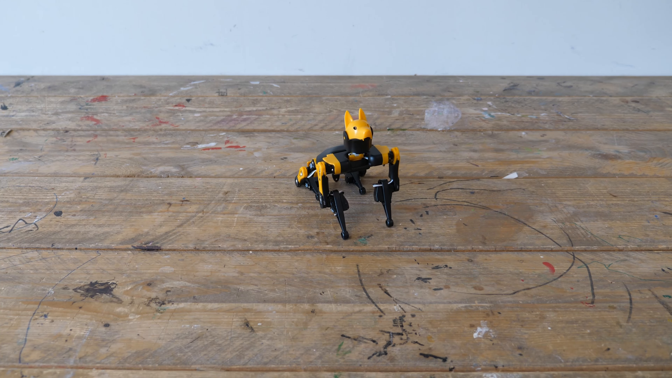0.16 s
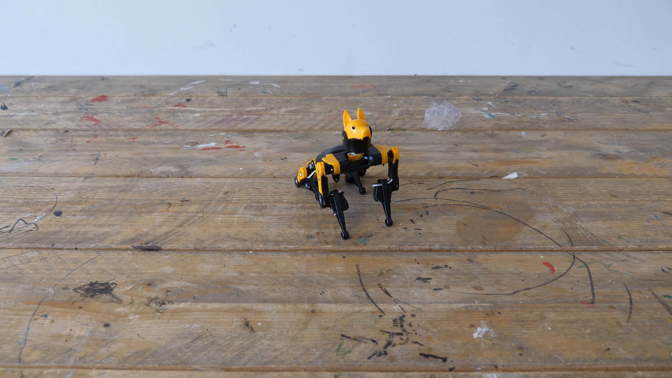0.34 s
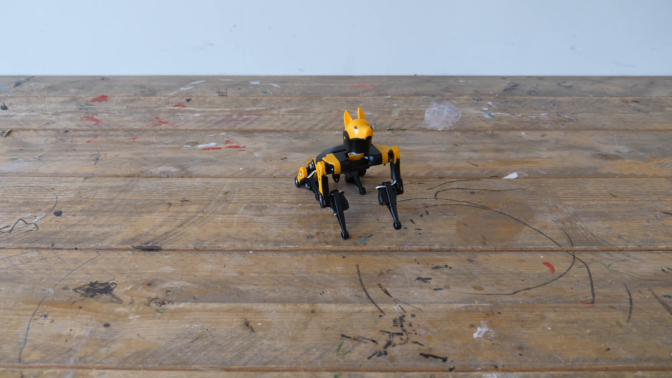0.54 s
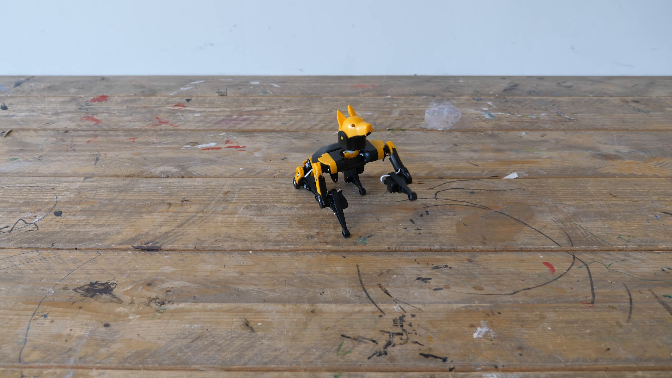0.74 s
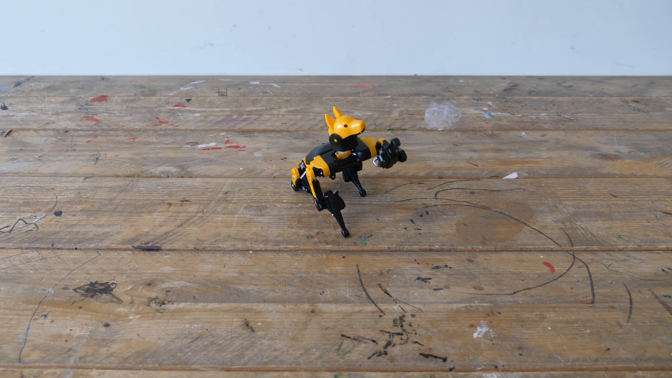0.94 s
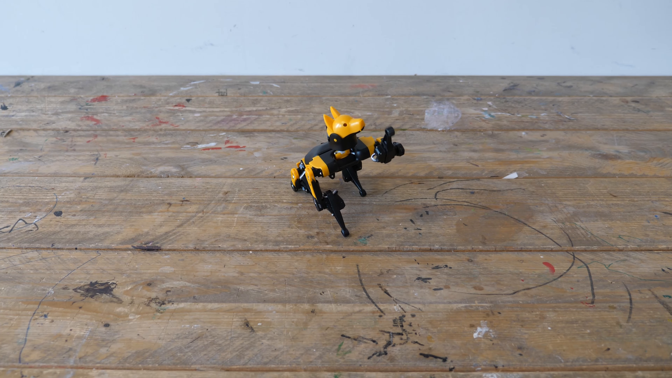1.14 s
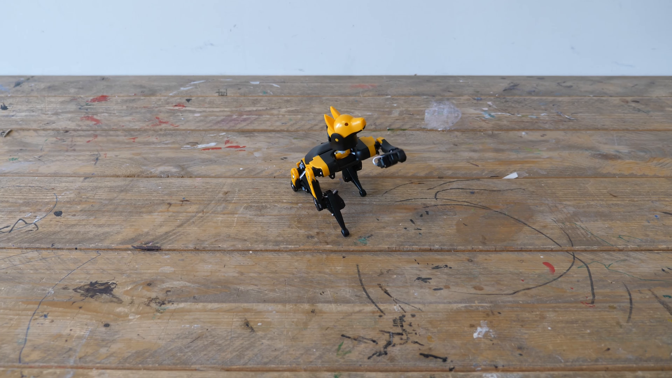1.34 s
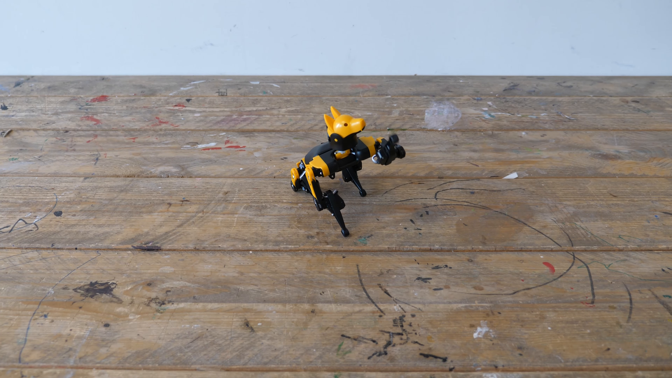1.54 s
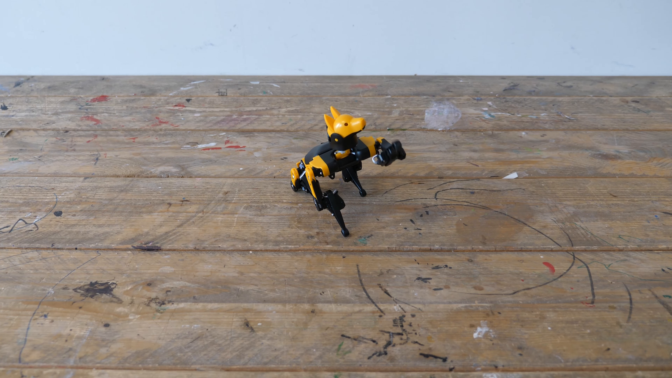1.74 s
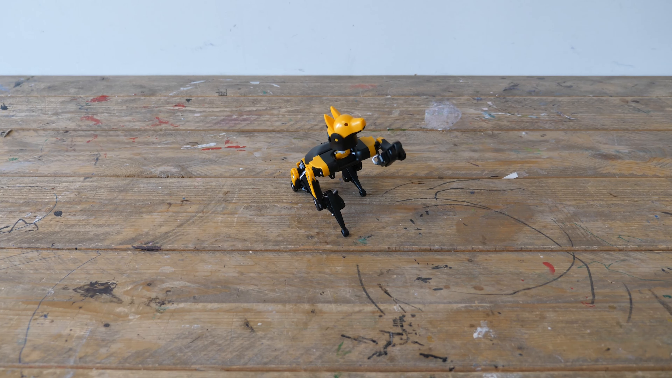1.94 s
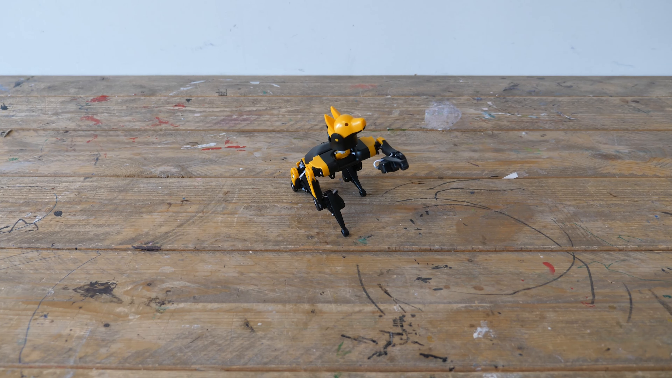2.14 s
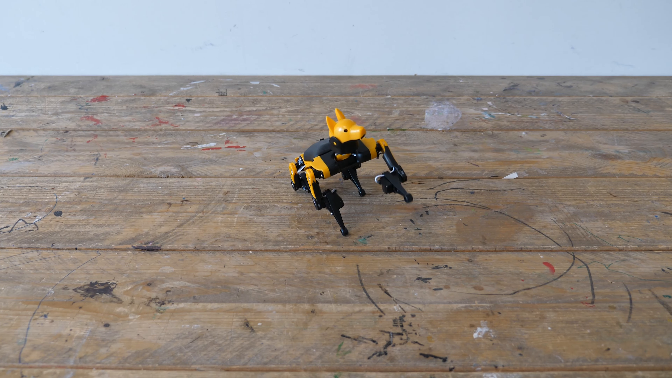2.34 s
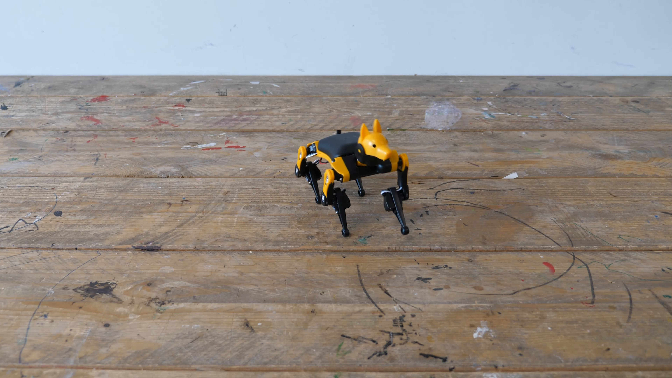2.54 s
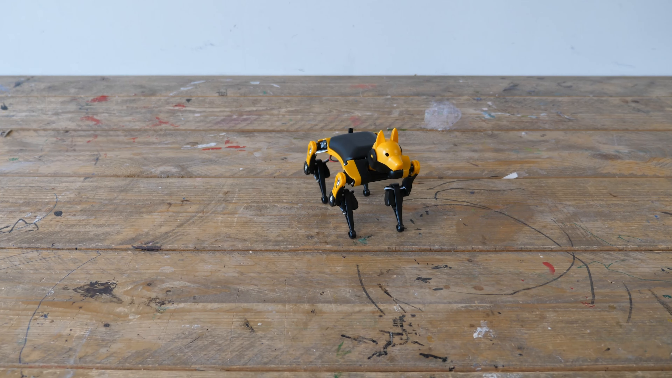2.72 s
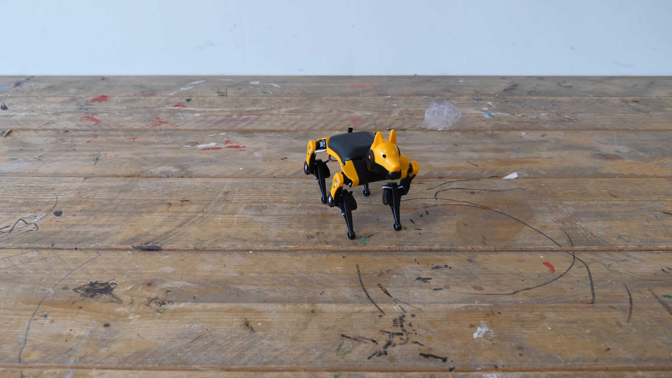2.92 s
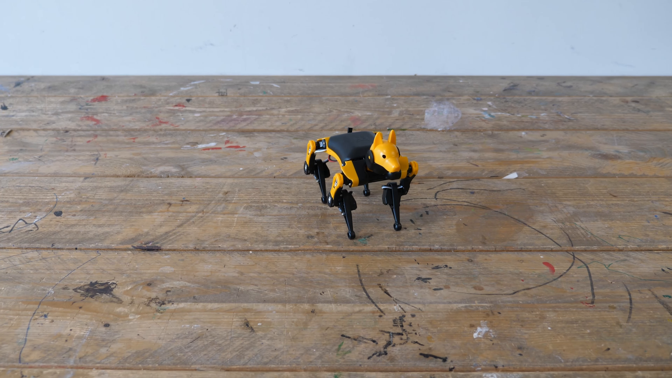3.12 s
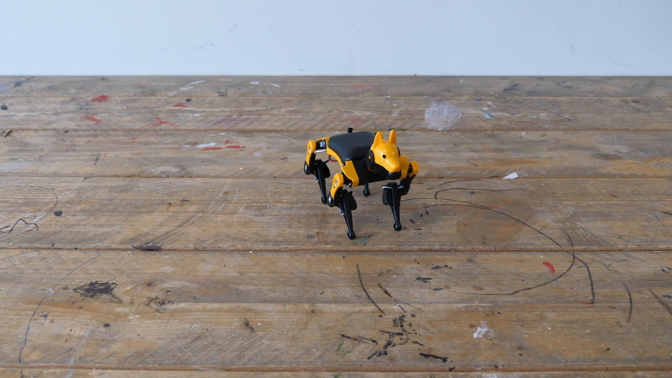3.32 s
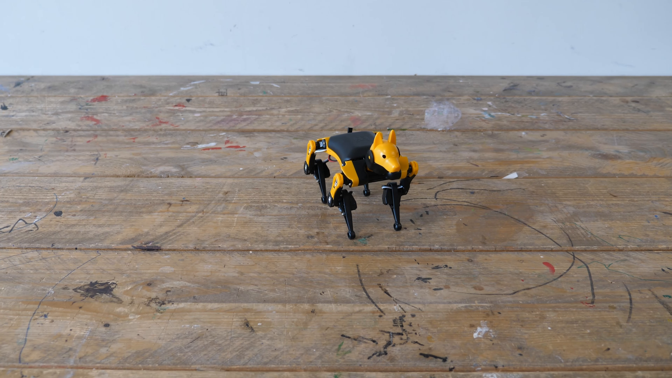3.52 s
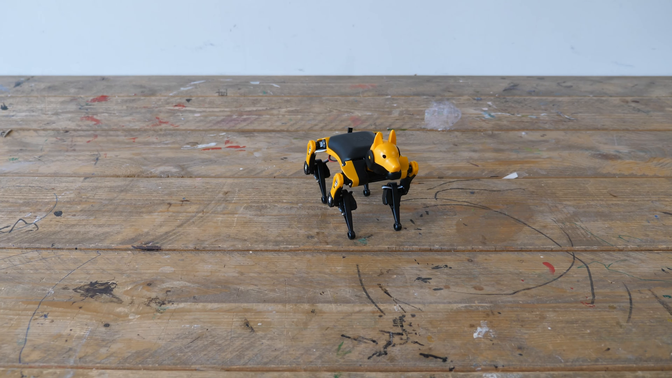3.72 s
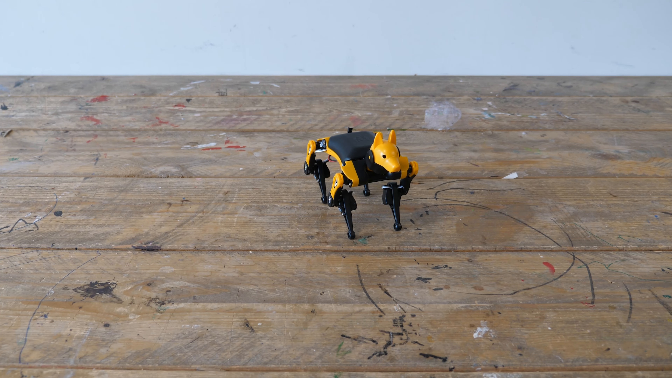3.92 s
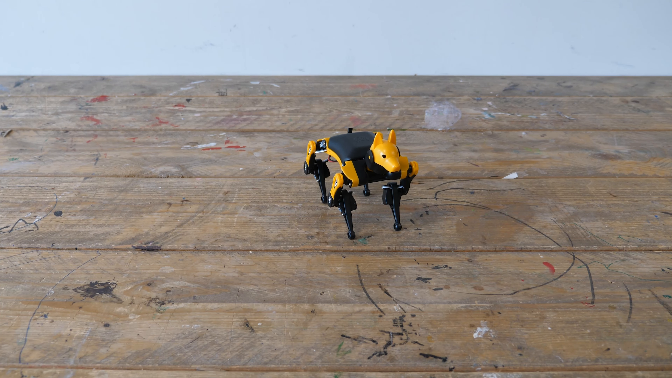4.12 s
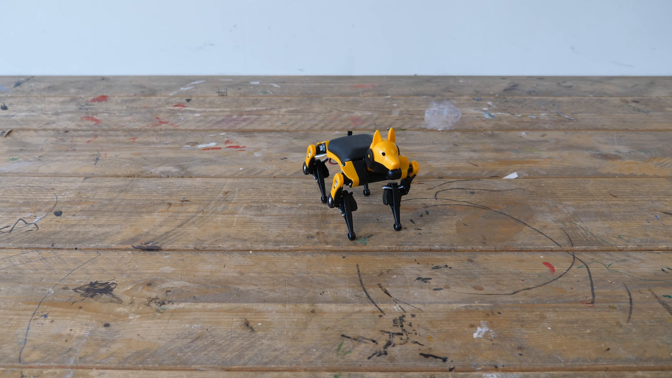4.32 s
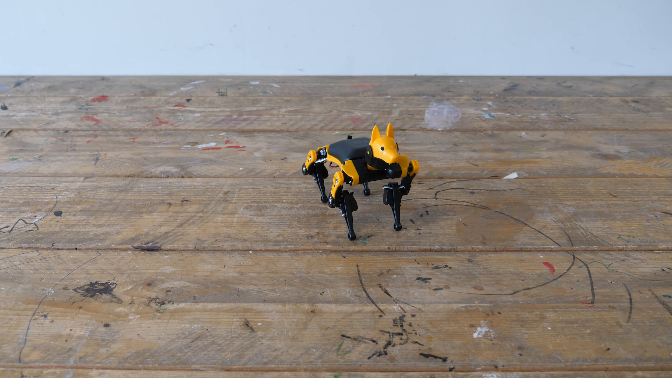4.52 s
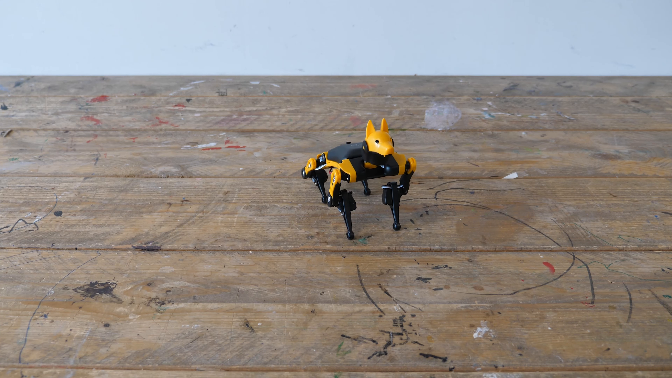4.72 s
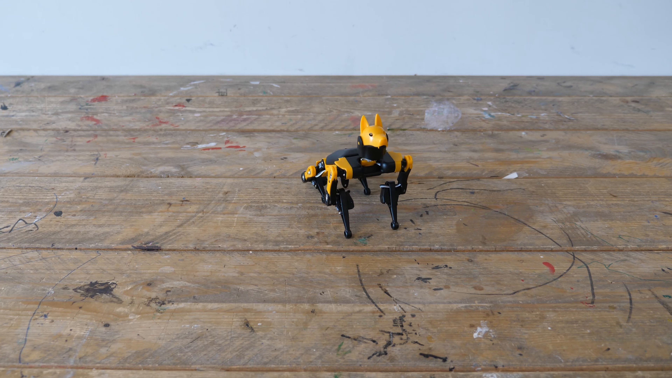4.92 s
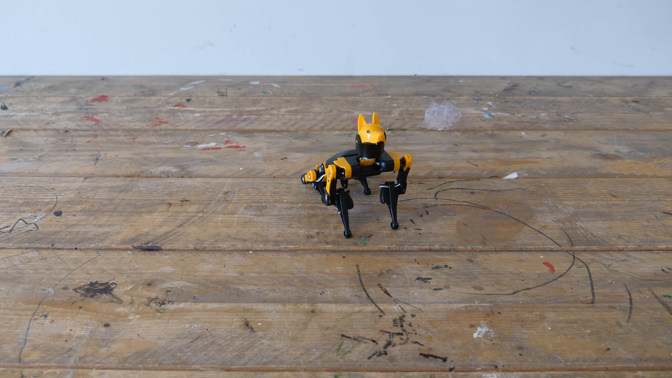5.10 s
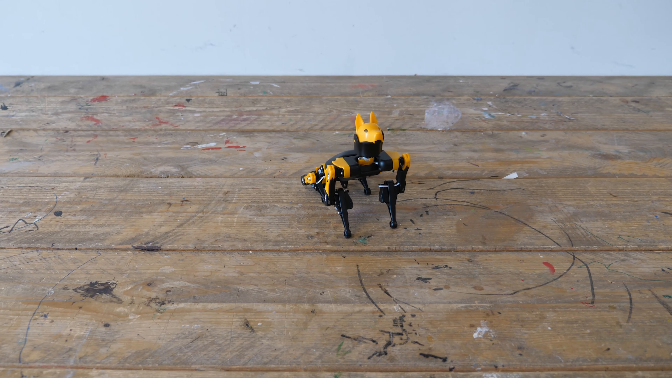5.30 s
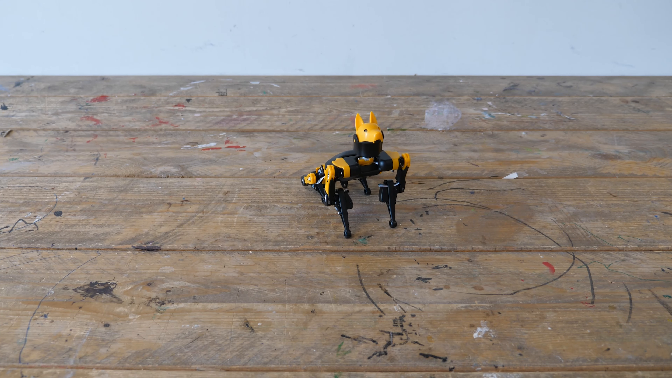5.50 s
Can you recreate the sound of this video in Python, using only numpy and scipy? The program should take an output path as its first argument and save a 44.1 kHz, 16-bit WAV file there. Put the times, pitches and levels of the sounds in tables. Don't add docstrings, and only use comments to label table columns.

```python
import sys
import numpy as np
from scipy import signal
from scipy.fft import rfft, irfft, next_fast_len
from scipy.io import wavfile
from scipy.ndimage import uniform_filter1d

SR = 44100
rng = np.random.default_rng(int(sys.argv[2]) if len(sys.argv) > 2 else 0)


def to_wav(sig):
    pcm = np.clip(np.atleast_2d(sig), -1, 1) * 32767
    pcm = np.round(pcm).astype(np.int16)
    wavfile.write(sys.argv[1], SR, pcm.T)


def volts(x):
    e = np.asarray(x, float) / 20
    return 10 ** e


N = 249247
STEP = 32
REFERENCE_DB = -50


def rms_one(x):
    return x / np.sqrt(np.mean(x ** 2) + 1e-20)


def drift(rate):
    r = np.exp(-40 * np.pi * rate / SR)
    noise = rng.standard_normal(N // 20 + 2002)
    slow = signal.lfilter([1], [1, -2 * r, r * r], noise)[2000:]
    return np.interp(np.arange(N) / 20, np.arange(len(slow)), rms_one(slow - slow.mean()))


def resonance(x, hz, width):
    r = np.exp(-np.pi * width / SR)
    return signal.lfilter([(1 - r * r) / 2, 0, (r * r - 1) / 2], [1, -2 * r * np.cos(2 * np.pi * hz / SR), r * r], x)


def body(x, modes):
    return sum((-1) ** k * volts(db) * resonance(x, hz, width) for k, (hz, width, db) in enumerate(modes))


def band(x, low_hz, high_hz):
    return signal.sosfilt(signal.butter(3, [low_hz, high_hz], "band", fs=SR, output="sos"), x)


def grains(per_s, spread_db):
    sizes = volts(spread_db * np.minimum(rng.exponential(1, N), 5)) * rng.choice([-1, 1], N)
    return sizes * (rng.random(N) < per_s / SR)


def evened(x):
    return x / np.sqrt(uniform_filter1d(x * x, size=4410) + 1e-20)


def hush():
    return 1e-9 * rng.standard_normal(N)


def full(slow):
    return np.interp(np.arange(N) / STEP, np.arange(len(slow)), slow)


BODY_MOVES = { "settle": [(0.0, -57), (0.142, -60.5), (0.206, -67.5), (0.246, -66), (0.378, -83.5),
              (0.46, -99.5)], "lift": [(0.462, -66), (0.518, -54.5), (0.6, -48.5), (0.764, -43),
              (0.946, -42.5), (1.075, -53), (1.09, -55), (1.135, -64), (1.16, -84)],
              "stand": [(2.16, -63.5), (2.192, -62), (2.308, -49.5), (2.516, -45.5), (2.652, -48),
              (2.69, -48)], "brace": [(2.69, -66), (2.719, -48), (2.793, -54.5), (2.84, -59), (2.87, -77),
              (2.93, -63), (2.96, -84.5), (3.06, -75)], "sit": [(4.16, -67), (4.22, -64), (4.304, -57),
              (4.492, -53), (4.78, -51), (4.9, -52), (5.198, -60), (5.3, -72.5), (5.6, -79)], }
LEG_STROKES = { "up": [(1.216, -47.5, 0.0037, 0.08), (1.581, -48, 0.023, 0.094),
               (1.954, -47.5, 0.028, 0.09)], "down": [(1.392, -45.5, 0.038, .12),
               (1.766, -45.5, .034, 0.13)], "twitch": [(1.19, -66.5, 0.018, .025), (5.2, -62.5, .01, 0.012),
               (5.375, -64, 0.025, 0.053)], }
STROKE_CURVE = {"up": (-7, -8, 261, 5.5), "down": (-14, -10.5, 550, -0.5),
                "twitch": (-3.5, -1, 599.5, -1.5)}


def efforts():
    t, out = np.arange(0, N, STEP) / SR, []
    shapes = [(name, rows, 0) for name, rows in BODY_MOVES.items()]
    for name, rows in LEG_STROKES.items():
        start_db, sag_db, brake, bright_db = STROKE_CURVE[name]
        for s, db, rise, run in rows:
            curve = [(s, db + start_db), (s + rise, db), (s + max(run, rise + .001), db + sag_db),
                     (s + run + 40 / brake, db + sag_db - 40)]
            shapes.append((name, curve, bright_db))
    for name, rows, bright_db in shapes:
        s, db = np.transpose(rows)
        along = np.clip((t - s[0]) / (s[-1] - s[0]), 0, 1)
        gate = np.interp(t, [s[0] - .004, s[0], s[-1], s[-1] + .02], [0, 1, 1, 0])
        effort_db = np.interp(t, s, db) - REFERENCE_DB
        out.append((name, effort_db, along, bright_db * np.sin(np.pi * along ** 0.45), gate))
    return out


GEAR_COLOUR = {"settle": (1.5, -4.5, -8.5, -2.5), "lift": (-1, -10, -12.5, -7),
               "stand": (3.5, 0.5, -6.5, -2), "brace": (2.5, -2.5, -6.5, -1), "sit": (2, -2, -9, 1.5),
               "up": (3, -4, -20.5, -7.5), "down": (0, -3, -10, -7), "twitch": (1, -2, -5.5, 3)}
LOWER_CASE_HZ = {"settle": (5360, 5100), "lift": (6040, 5220), "stand": (5200, 5620), "brace": (4630, 4300),
                 "sit": (5020, 4980), "up": (5470, 5570), "down": (5560, 5350), "twitch": (5350, 5250)}
GEAR_SWING = (1.11, 1.25, 1.22, 0.74)


def gear_controls():
    power, case_hz, blur_db, weight = 0, 0, 0, 0
    for name, effort_db, along, bright_db, gate in efforts():
        upper_db, top_db, shell_db, broad_db = GEAR_COLOUR[name]
        zones_db = [0, upper_db, top_db + bright_db, shell_db + 2.4 * bright_db]
        gains = [gate * volts(REFERENCE_DB + z + k * effort_db) for z, k in zip(zones_db, GEAR_SWING)]
        power = power + np.array(gains) ** 2
        share = gate * volts(2 * effort_db) + 1e-12
        first_hz, last_hz = LOWER_CASE_HZ[name]
        case_hz = case_hz + share * (first_hz + (last_hz - first_hz) * along)
        blur_db = blur_db + share * broad_db
        weight = weight + share
    return [full(v) for v in (*np.sqrt(power), case_hz / weight, volts(blur_db / weight))]


def gliding(x, hz, width):
    y, state, r = np.zeros(N), np.zeros(2), np.exp(-np.pi * width / SR)
    for i in range(0, N, 128):
        poles = [1, -2 * r * np.cos(2 * np.pi * hz[i] / SR), r * r]
        y[i:i + 128], state = signal.lfilter([1, 0, -1], poles, x[i:i + 128], zi=state)
    return y


def streaks(teeth):
    pitches = np.geomspace(2100, 15300, 36) * volts(0.21 * rng.standard_normal(36))
    parts = sum(volts(4.6 * drift(5.2)) * resonance(teeth, hz, 0.012 * hz) for hz in pitches)
    return rms_one(teeth) + volts(-3) * rms_one(parts)


# pitch_hz, width_hz, level_db
UPPER_RING = [(7165, 420, -7.5), (7940, 220, 0.5), (8380, 330, -1), (9030, 570, -9.5)]
# pitch_hz, width_hz, level_db
TOP_HISS = [(10360, 1800, -10.5), (12150, 1250, -8.5), (15840, 1100, -6)]
# pitch_hz, width_hz, level_db
SHELL_MODES = [(2480, 1360, 2), (2954, 280, 9), (3670, 640, -4.5), (4350, 110, 0)]
# pitch_hz, width_hz, share taken out
CASE_NOTCH = (11500, 1000, 0.28)


def gears():
    beat_hz, beat_db, teeth_per_s = 59.3, 1.5, 5000
    quiet_db, lumps_per_db = -64, 0.05
    speed_per_db = -0.34
    lower, upper, top, shell, case_hz, blur = gear_controls()
    rattle_db = np.maximum(20 * np.log10(lower + 1e-9), quiet_db - 20)
    turn_hz = beat_hz * (1 + 0.048 * drift(4.9) + speed_per_db * (rattle_db - REFERENCE_DB))
    turn = 2 * np.pi * np.cumsum(turn_hz) / SR
    depth = 1 + lumps_per_db * np.maximum(quiet_db - rattle_db, 0)
    swing_db = beat_db * blur ** -0.5
    beat = volts(depth * (swing_db * np.cos(turn) + 1.1 * drift(53) + 0.35 * drift(49)))
    one, other = [beat * grains(teeth_per_s, spread_db=2.5) for k in range(2)]
    other = streaks(other)

    def zone(rings, low_hz, high_hz):
        ringing = rms_one(band(rings, 0.99 * low_hz, 1.094 * high_hz))
        return evened(ringing + blur * rms_one(band(other, low_hz, high_hz)))

    out = lower * zone(gliding(one, case_hz, width=490), 4144, 5430)
    out += upper * zone(body(one, UPPER_RING), 5080, 10360)
    out += top * zone(body(one, TOP_HISS), 9480, 13600)
    out += shell * zone(body(one, SHELL_MODES), 1550, 3480)
    return out - CASE_NOTCH[2] * resonance(out, *CASE_NOTCH[:2])


# start_s, length_s, pitch_hz, level_db
SINGING_TONES = [(.66, 0.043, 1073, -46), (.72, 0.06, 1370, -50.5), (0.774, 0.095, 1700, -57),
                 (0.873, 0.087, 1390, -54.5), (1.228, 0.075, 1363, -59.5), (1.24, 0.15, 511, -59),
                 (.675, 0.041, 293, -48.5), (.91, 0.04, 291, -55), (4.75, 0.045, 824, -51.5),
                 (2.47, 0.048, 520, -55.5), (1.41, 0.12, 505, -63), (1.628, 0.041, 627, -66.5),
                 (1.66, 0.038, 520, -56), (1.79, 0.091, 520, -60), (1.97, 0.15, 520, -63),
                 (2.03, 0.041, 447, -57.5), (2.587, 0.068, 318.5, -49), (2.686, 0.19, 313, -44),
                 (2.884, 0.22, 326.5, -65.5), (2.737, 0.013, 4080, -47), (4.155, 0.055, 835, -53),
                 (4.24, 0.053, 484, -54.5), (4.288, 0.057, 692, -55.5), (4.3, 0.073, 780, -51.5),
                 (4.455, 0.05, 490, -51.5), (4.66, 0.072, 3410, -58.5), (4.668, 0.14, 1075, -55.5),
                 (4.798, 0.079, 3400, -60.5), (5.114, 0.069, 627, -57.5), (5.22, 0.037, 842, -55)]


def singing():
    out, waver, flutter = np.zeros(N), drift(25.4), drift(31)
    for s, length, hz, level_db in SINGING_TONES:
        span = slice(round(s * SR), round((s + 1.01 * length) * SR))
        phase = 2 * np.pi * np.cumsum(hz + (2.9 + 0.011 * hz) * waver[span]) / SR
        swell = np.hanning(len(phase)) ** 0.45
        out[span] += volts(level_db + 3.5 + 3.0 * flutter[span]) * swell * np.sin(phase)
    return out


TABLE_COUPLING = {"settle": (-51, -57.5, -52, -56), "lift": (-56, -63.5, -65.5, -60),
                  "stand": (-61.5, -63.5, -63.5, -57), "brace": (-51, -62, -76, -72),
                  "sit": (-55.5, -59.5, -60, -56.5), "up": (-56.5, -55.5, -69, -62),
                  "down": (-57, -57.5, -73, -62), "twitch": (-81, -73, -51, -54)}
TABLE_SWING = (0.45, 0.87, 0.92, 0.86)
MODE_LAG_S = (0.043, 0.037, 0.017, 0.0067)
FOOT_SLIDES = {"drag": [(0.547, .05, -75, -20, 13), (0.651, 0.026, -46.5, -6, 5),
               (1.08, 0.022, -57.5, -10.5, -17), (2.185, .08, -55.5, -7.5, -17),
               (2.51, 0.12, -48.5, -3, -21), (4.125, 0.076, -56, -7.5, -20),
               (4.29, 0.057, -59, -6.5, -12.5), (4.85, 0.041, -59, -9, 3), (5.22, .06, -58.5, -10, -7.5),
               (5.4, 0.076, -62.5, -6, -10)], "landing": [(2.685, 0.098, -40.5, -4, -9)]}
SLIDE_CURVE = {"drag": (0.018, 170, -6), "landing": (0.008, 156, -10)}


def table_drive():
    t = np.arange(0, N, STEP) / SR
    motors = 0
    for name, effort_db, along, bright_db, gate in efforts():
        gains = [gate * volts(c + k * effort_db) for c, k in zip(TABLE_COUPLING[name], TABLE_SWING)]
        motors = motors + np.array(gains) ** 2
    keep = np.exp(-STEP / SR / np.array(MODE_LAG_S))
    power = np.array([signal.lfilter([1 - r], [1, -r], m, zi=[r * m[0]])[0] for r, m in zip(keep, motors)])
    for name, (rise, fade, thrum_db) in SLIDE_CURVE.items():
        for s, length, db, low_db, upper_db in FOOT_SLIDES[name]:
            shape = np.clip((t - s) / rise, 0, 1) ** 2 * volts(db - fade * np.maximum(t - s - length, 0))
            power += (shape * volts(np.array([[thrum_db], [low_db], [0], [upper_db]]))) ** 2
    return [full(v) for v in np.sqrt(power)]


# pitch_hz, width_hz, level_db
TABLE_MODES = [
    [(66, 37, 0.5), (120.8, 14.8, 0.5), (214.4, 40, -3.5), (309, 16.5, -5.5)],
    [(466.7, 6.8, 2), (520, 10.3, 6.5)],
    [(691.3, 18, 3.5), (780, 50, 5.5), (835, 45, 7.5), (898, 19.4, -7.5)],
    [(1067, 77, 4), (1179, 11.3, -1.5), (1390, 45, 1.5), (1700, 330, -7)],
]


def table_shake():
    out = np.zeros(N)
    for modes, drive in zip(TABLE_MODES, table_drive()):
        force = grains(900, spread_db=2.5) * volts(2.1 * drift(22))
        rings = 0
        for hz, width, db in modes:
            ring = resonance(resonance(force, hz, width), hz, 6 * width)
            rings = rings + volts(db + 3.8 * drift(3.66)) * rms_one(ring)
        between = rms_one(band(grains(900, spread_db=4.5), 0.83 * modes[0][0], 1.06 * modes[-1][0]))
        out += drive * evened(rings + between)
    return out


# start_s, peak_db, contact_ms
FOOTFALLS = [(.672, -30.5, 0.92), (2.6759, -20.5, 0.1), (2.679, -12, 0.18), (2.679, -40, 0.12),
             (2.682, -18, 0.1), (2.6839, -20, 0.067), (2.686, -14, 0.13), (2.6924, -20, 0.31),
             (2.6935, -26, 0.25), (2.6994, -35, 0.18), (2.782, -31.5, 0.4)]


def feet():
    push, t_ms = hush(), np.arange(200) / SR * 1000
    for s, peak_db, contact_ms in FOOTFALLS:
        i = round(s * SR) - 4
        force = np.exp(-(t_ms / max(contact_ms, .03) * 1.28 - 1.6) ** 2)
        push[i:i + 200] += volts(peak_db) * force
    clack = band(push, 1120, 5900)
    clack += volts(6) * body(clack, [(1510, 29, -6), (1970, 440, 1.5), (2300, 170, -1.5),
                                   (3290, 460, 6.0), (4520, 350, 0.5)])
    ring = body(push, [(hz, 0.45 * w, db) for group in TABLE_MODES[1:] for hz, w, db in group])
    return volts(2.0) * clack + volts(11.0) * ring + volts(-1.5) * body(push, TABLE_MODES[0])


# start_s, peak_db, lower_ring_db (relative)
JOINT_TICKS = [(0.465, -46, 3), (1.1862, -48, -12), (1.395, -38.5, 4.5), (1.7674, -41, -2),
               (2.7123, -23.5, -16), (2.728, -29, -18), (2.8968, -45, 3), (2.9727, -43.5, -12),
               (3.024, -47.5, 0), (3.0365, -42, -10), (2.904, -40, -3.5), (3.5483, -51, -2),
               (3.881, -46.5, -2), (5.211, -31, -7), (4.756, -27, -18), (4.763, -27.5, -18),
               (5.398, -49.5, -4.5), (5.4154, -48.5, -11), (5.425, -50, -10.5), (5.433, -46.5, -6)]


def ticks():
    upper, lower, t = hush(), hush(), np.arange(300) / SR
    rebound = 0.29 * (t > .0028) * np.exp(-(t - .0028) / 0.00051)
    shape = np.exp(-t / 0.00032) + rebound
    for s, peak_db, lower_db in JOINT_TICKS:
        i, crack = round(s * SR), shape * rng.standard_normal(300)
        crack /= np.max(np.abs(crack))
        upper[i:i + 300] += volts(peak_db) * crack
        lower[i:i + 300] += volts(peak_db + lower_db) * crack
    cases = volts(13.5) * body(upper, UPPER_RING) + volts(7) * band(lower, 3900, 6900)
    return volts(0.5) * band(upper, 4200, 15400) + cases


# start_s, peak_db
CREAK_SLIPS = [(3.982, -23), (3.9831, -27), (3.9851, -24.5), (3.9898, -24), (3.9934, -32), (3.9946, -24),
               (3.997, -36.5)]
# pitch_hz, width_hz, level_db
CREAK_SHELL = [(1960, 85, -12), (2800, 180, -24), (3180, 300, 12), (3630, 390, 12.5), (4090, 290, 4.5),
               (5690, 210, 1.5), (7300, 620, -10.5), (8900, 170, -13)]
# pitch_hz, level_db, t60_s
CREAK_PARTS = [(1927, -18, .4), (3130, -23.5, .36), (3910, -8, 0.26), (5540, -16, 0.33), (6170, -7, 0.15),
               (7000, -6, 0.14)]


def creak():
    slips, at = hush(), [round(s * SR) for s, db in CREAK_SLIPS]
    end = at[-1] + 100
    slips[at[0]:end] = volts(-58) * rng.standard_normal(end - at[0])
    slips[at] = volts(np.array(CREAK_SLIPS)[:, 1])
    shell = body(body(slips, CREAK_SHELL), [(hz, 4 * w, 0) for hz, w, db in CREAK_SHELL])
    parts = [(hz, 1.6 / t60, db - 20 * np.log10(2.0 / t60)) for hz, db, t60 in CREAK_PARTS]
    ring = body(slips, parts)
    return volts(25.0) * shell + volts(49.5) * ring + volts(3) * band(slips, 710, 2800) + volts(-19) * slips


def room(x):
    t60_s, wall_cut_hz = 0.51, 3900
    size = next_fast_len(N + SR)
    w = 2 * np.pi * np.fft.rfftfreq(size)
    dull = 1 / np.sqrt(1 + (w * SR / (2 * np.pi * wall_cut_hz)) ** 2) ** 0.13
    tail = 0
    for k, lag in enumerate(rng.uniform(.006, .04, 12) * SR):
        loop = volts(-60 * lag / SR / t60_s) * dull * np.exp(-1j * w * lag)
        tail = tail + (-1) ** k * loop / (1 - loop)
    return irfft(rfft(x, size) * tail, size)[:N]


# pitch_hz, level_db (per Hz)
AIR_SPECTRUM = [(15, -25), (35, 3), (130, -5.5), (230, -4.5), (330, -6.5), (630, -13), (1300, -16),
                (1950, -23), (2450, -21.5), (3300, -28), (5500, -29), (9000, -31), (15800, -32.5)]


def air():
    hz, level_db = np.transpose(AIR_SPECTRUM)
    bins = np.maximum(np.fft.rfftfreq(N, 1 / SR), 1)
    colour = volts(np.interp(np.log(bins), np.log(hz), level_db))
    return volts(-60) * rms_one(irfft(rfft(rng.standard_normal(N)) * colour, N))


def scene():
    creaking = creak()
    near = gears() + feet() + ticks() + singing()
    tail = volts(-27) * room(volts(0.5) * near + volts(-3.5) * creaking)
    mono = near + creaking + tail + table_shake() + air()
    return np.array([mono, mono])


def roll_off(x):
    return signal.sosfilt(signal.butter(12, 16420, fs=SR, output="sos"), x)


def record(dry):
    difference = (volts(-41.5) * dry[0] + volts(-31.5) * np.diff(dry[0], prepend=0)) * drift(140)
    low_pass = signal.ellip(12, .3, 80, 15810, fs=SR, output="sos")
    cut = signal.sosfilt(low_pass, dry + difference * [[1], [-1]])
    return roll_off(cut)


dry = scene()
out = record(dry)
to_wav(out)
```